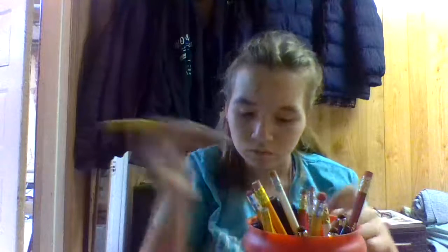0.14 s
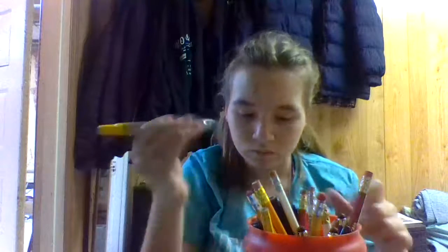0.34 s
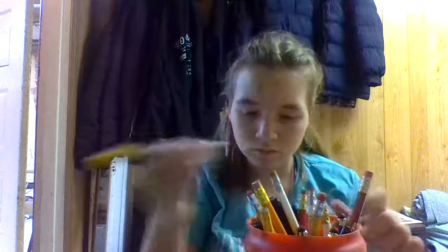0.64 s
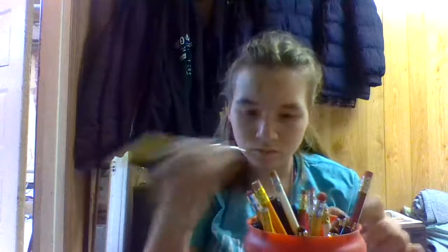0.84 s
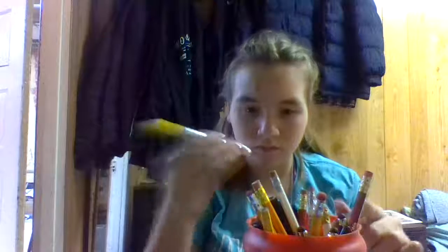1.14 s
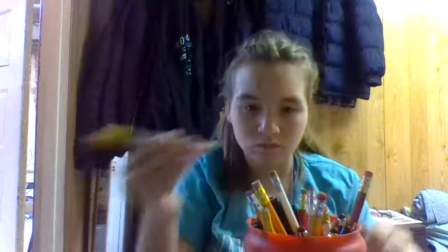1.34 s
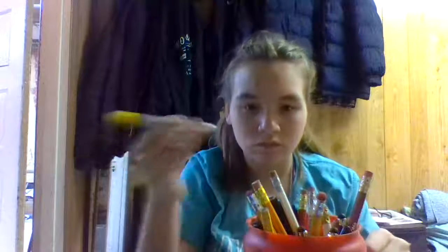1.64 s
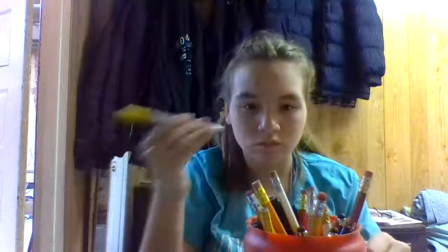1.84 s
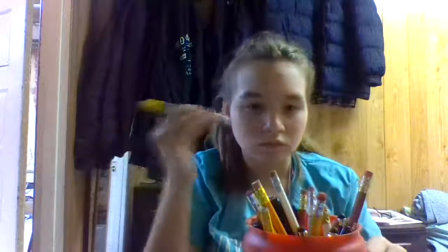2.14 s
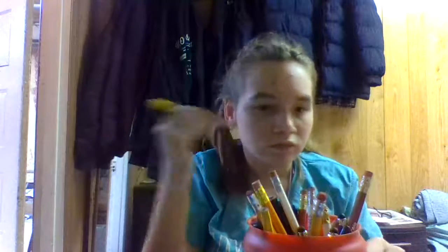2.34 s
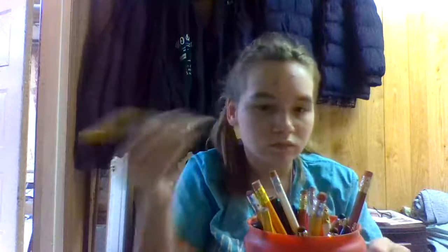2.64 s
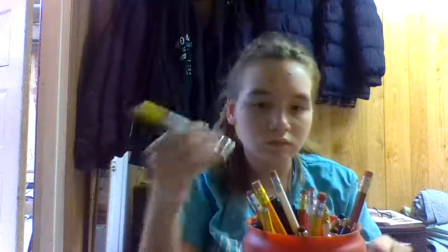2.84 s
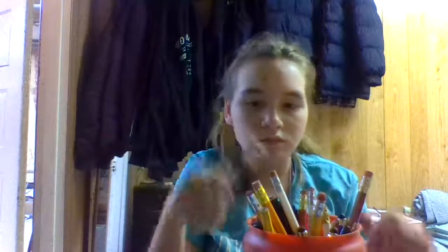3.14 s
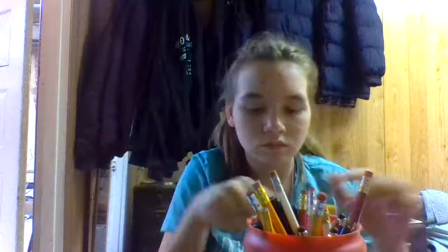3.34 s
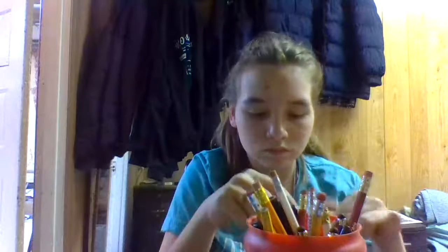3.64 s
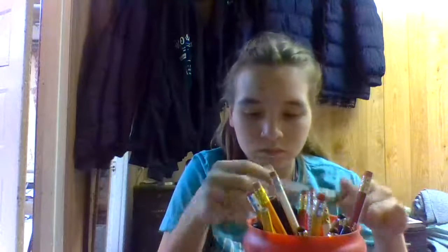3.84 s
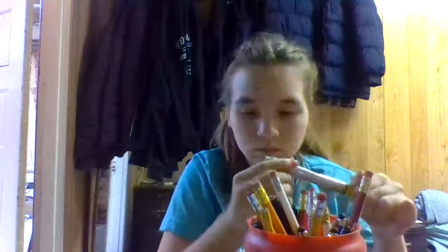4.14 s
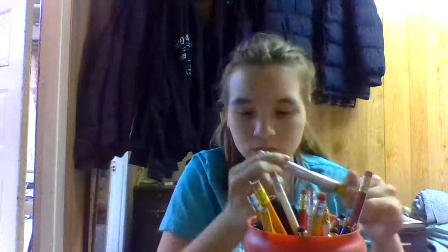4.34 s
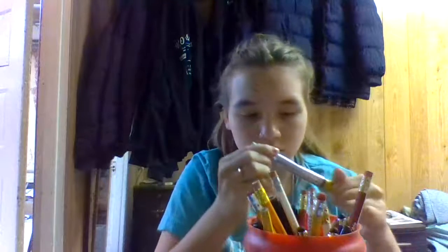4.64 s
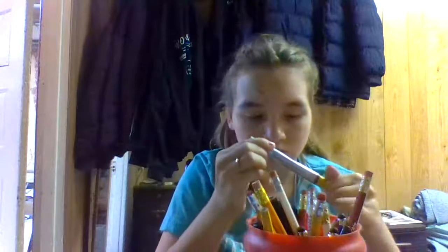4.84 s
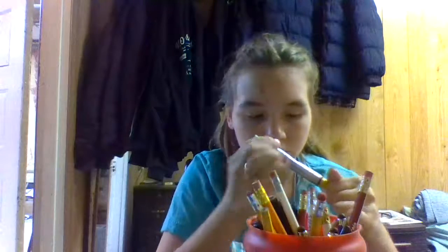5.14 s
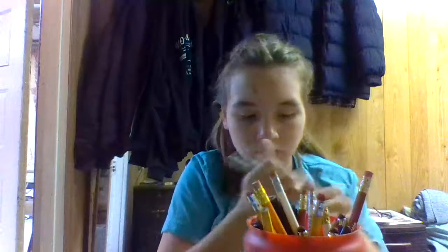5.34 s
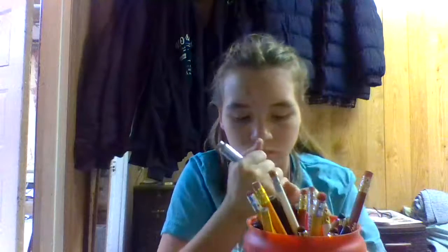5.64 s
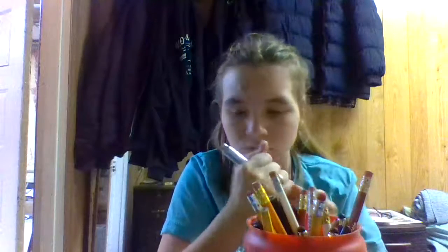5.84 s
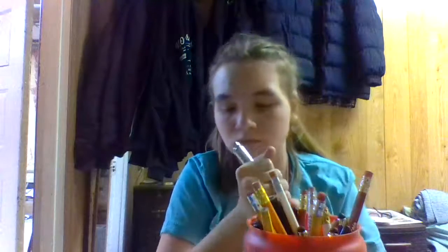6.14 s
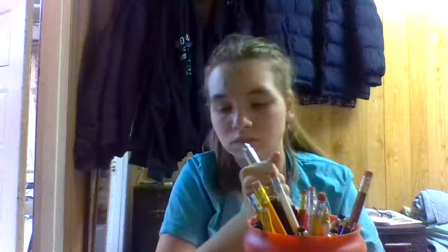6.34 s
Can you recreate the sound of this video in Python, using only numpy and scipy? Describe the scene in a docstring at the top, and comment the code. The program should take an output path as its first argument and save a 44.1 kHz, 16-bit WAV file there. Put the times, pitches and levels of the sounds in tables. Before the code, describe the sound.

A small, quiet room with low, soft fan rumble, fuzzy hum, microphone hiss and a very faint high whine with rapid pulsing. From 0.14 s a pen-like tube is shaken close to a laptop microphone: loose parts strike end to end in hard, bright, plastic-like clacks, roughly four strong hits per second with smaller uneven ticks between. The loudest, near 0.27, 0.55 and 1.0 s, overload slightly; each has a brief ring and short room echo. A low puff of air thumps at 1.23 s. Shaking pauses around 2.1-2.4 s, where a faint, thin whistle sags and drops. Clacks resume at 2.45 s, cluster around 2.7-3.2 s, then stop. A lone clack comes at 3.64 s and a weak one at 4.05 s. Soft fizzy finger slides occur at 3.7, 4.4-4.7 and 5.1-5.5 s, with barely audible ticks; then only background remains until about 6.4 s.

```python
"""Rattling tube shaken by hand

A hand shakes a pen-like tube close to a laptop microphone in a small quiet room, then fingers turn it over.
Clacks are bursts of tiny knocks with a ring and a room echo; the hardest ones overload the input.
One puff of air thumps, a thin whistle sags and drops away, and sliding fingers make swells of bright noise.
Behind them lie a fan of shaped noise and fuzzy tones, microphone hiss, and a faint whine of sine tones.
"""
import sys
import numpy as np
from scipy import signal
from scipy.fft import rfft, irfft
from scipy.io import wavfile
from scipy.ndimage import uniform_filter1d

SR = 44100
rng = np.random.default_rng(int(sys.argv[2]) if len(sys.argv) > 2 else 0)


def wav_out(sig):
    """Save sig, one row per channel (or a flat mono array), as 16-bit PCM at SR to the path in sys.argv[1]."""
    wavfile.write(sys.argv[1], SR, np.round(np.clip(np.atleast_2d(sig).T, -1, 1) * 32767).astype(np.int16))


N = 286209  # length in samples
NOISE_TOP_HZ = 15850  # noise layers and room echo stop here


def gain_of(db):
    """Turn decibels into an amplitude factor."""
    return 10 ** (np.asarray(db) / 20)


def evened(x):
    """Scale a signal to an RMS of one."""
    return x / np.sqrt(np.mean(x ** 2) + 1e-20)


def read_curve(points, hz):
    """Read a curve of (Hz, value) points, interpolated along log frequency."""
    point_hz, value = np.transpose(points)
    return np.interp(np.log(hz + 1), np.log(point_hz + 1), value)


def add(mix, start_s, sound):
    """Mix a sound in at its start, cut off at the end of the scene."""
    part = mix[round(start_s * SR):][:len(sound)]
    part += sound[:len(part)]


def coloured(points, patchy_db):
    """Noise from random short-time spectra, with patches of level that drift in time and frequency."""
    hz = np.fft.rfftfreq(2048, 1 / SR)
    real, imaginary, patches = rng.standard_normal((N // 512 + 5, 1025, 3)).T
    patches = evened(uniform_filter1d(uniform_filter1d(patches, 6, 0), 6, 1))
    level_db = read_curve(points, hz)[:, None] + patchy_db * patches
    spectra = (real + 1j * imaginary) * gain_of(level_db) * (hz < NOISE_TOP_HZ)[:, None]
    return evened(signal.istft(spectra, nperseg=2048, noverlap=1536)[1][:N])


def fan():
    """Moving air makes broad rumble; narrow noise bands around fixed pitches make fuzzy tones."""
    # Rumble colour. Each row: frequency in Hz, relative density in dB per Hz.
    air_colour = [(8.8, -16), (15, 4.5), (32, -2), (49, -6.5), (118, -3.5), (207, -11), (239, -20),
                  (296, -19), (324, -36), (409, -25.5), (448, -34.5), (608, -27), (665, -41), (768, -25.5),
                  (1100, -40), (1430, -67.5), (2420, -120)]
    # Fuzzy tones. Each row: centre in Hz, width in Hz, RMS level in dB.
    hums = [(119.1, 5.6, -43), (299.8, 8, -57), (634, 23, -60.5), (6200, 49, -74.5)]
    t = np.arange(N) / SR
    out = gain_of(-35) * coloured(air_colour, patchy_db=1.5)
    for hz, width_hz, db in hums:
        pole = np.exp(-np.pi * width_hz / SR)
        noise = rng.standard_normal(N) + 1j * rng.standard_normal(N)
        drift = signal.lfilter([1 - pole], [1, -pole], noise)
        out += gain_of(db) * evened((drift * np.exp(2j * np.pi * hz * t)).real)
    return out


def microphone_hiss():
    """Steady noise of the microphone, weaker towards the treble."""
    # Hiss colour. Each row: frequency in Hz, relative density in dB per Hz.
    hiss_colour = [(590, -6.5), (1000, -1), (2100, -3.5), (2240, -4), (2770, -6), (6830, -15.5),
                   (8280, -17), (10300, -14), (13000, -21)]
    return gain_of(-55) * coloured(hiss_colour, patchy_db=0.9)


def electronics():
    """A high hump of hiss, a comb of steady sine tones, and sine tones that pulse on and off."""
    # High hiss hump. Each row: frequency in Hz, relative density in dB per Hz.
    top_hiss = [(11000, -37), (12500, -18.5), (13600, -5), (13950, -5), (14450, -4), (14700, -15),
                (15900, -29)]
    # Steady whine. Each row: multiple of the base pitch, RMS level in dB.
    whine = [(36, -84.5), (40, -81), (41, -86.5), (42, -85), (44, -74), (45, -75), (48, -79.5), (50, -78)]
    # Pulsing tones. Each row: frequency in Hz, RMS level while on in dB.
    pulsed_tones = [(8000, -70), (8683, -81), (13096, -66), (13790, -73)]
    whine_base_hz = 307.2
    pulses_per_s, pulse_middle_s, on_share = 16.7, 5.2816, 0.53
    t = np.arange(N) / SR

    hiss = gain_of(-58.5) * coloured(top_hiss, patchy_db=2.0)
    steady = sum(gain_of(db) * np.sin(2 * np.pi * (multiple * whine_base_hz * t + rng.random()))
                 for multiple, db in whine)
    pulsed = sum(gain_of(db) * np.sin(2 * np.pi * (hz * t + rng.random())) for hz, db in pulsed_tones)
    turn = ((t - pulse_middle_s) * pulses_per_s + 0.5) % 1 - 0.5  # zero in the middle of each pulse
    on = np.clip((on_share / 2 - abs(turn)) * 30 + 0.5, 0, 1)  # soft-edged switch
    return hiss + np.sqrt(2) * (steady + on * pulsed)  # root two: RMS to peak


def fingers():
    """Skin sliding on the tube: bright friction noise that swells, holds and fades with each slide."""
    # Finger slides. Each row: start in seconds, length in seconds, held level in dB.
    rubs = [(3.7, 0.24, -58.5), (4.419, 0.29, -57.5), (4.67, .07, -63), (5.14, .1, -54), (5.32, .07, -58),
            (5.44, 0.049, -55)]
    # Friction colour. Each row: frequency in Hz, relative density in dB per Hz.
    rub_colour = [(3000, -36.5), (8000, -14), (11000, -8), (13500, -2.5), (15900, -4)]
    attack, release = 0.19, 0.4  # shares of the slide
    t, level = np.arange(N) / SR, np.zeros(N)
    for start_s, length_s, db in rubs:
        progress = (t - start_s) / length_s
        swell = np.minimum(progress / attack, (1 - progress) / release)
        level += gain_of(db) * np.clip(swell, 0, 1)
    return level * coloured(rub_colour, patchy_db=1.5)


def squeak():
    """A thin wavering sine whistle whose pitch sags slowly, then drops away."""
    # One whistle: start in seconds, length in seconds, base pitch in Hz, level in dB before the waver.
    whistle = (2.09, .23, 5690, -63)
    sag_hz_per_s, drop_hz, drop_s, fade_s = 780, 280, 0.05, 0.03
    start_s, length_s, hz, db = whistle
    t, out = np.arange(0, length_s, 1 / SR), np.zeros(N)
    left_s = length_s - t
    pitch = hz - sag_hz_per_s * t - drop_hz * np.clip(1 - left_s / drop_s, 0, 1) ** 2
    fade = np.clip(np.minimum(t, left_s) / fade_s, 0, 1)
    waver = 1 + 0.65 * evened(uniform_filter1d(rng.standard_normal(len(t)), 600))
    phase = 2 * np.pi * np.cumsum(pitch + 20 * waver) / SR  # the waver moves pitch and level together
    add(out, start_s, gain_of(db) * fade * waver * np.sin(phase))
    return out


def thump():
    """A puff of air from the hand hits the microphone port: a quick push of pressure and a slow rebound."""
    # One puff: start in seconds, level in dB before shaping, fall time constant in seconds, rebound in Hz.
    puff = (1.2303, -4, .004, 28)
    start_s, db, fall_s, rebound_hz = puff
    t, out = np.arange(4000) / SR, np.zeros(N)
    push = 1.6 * (1 - np.exp(-t / 0.0008)) * np.exp(-t / fall_s)
    rebound = 0.35 * np.sin(2 * np.pi * rebound_hz * t) * np.exp(-t / 0.025)
    add(out, start_s, gain_of(db) * (push - rebound))
    return out


LEAD = 256  # samples ahead of each blow


def clack(band_levels_db, ring_hz, ring_db, echo_db):
    """A sharp blow with a dying spray of tiny knocks, then the dense echo of the room, band by band."""
    # Clack colour at the microphone. Each row: frequency in Hz, relative density in dB per Hz.
    clack_colour = [(150, -43), (250, -30.5), (521, -21.5), (1190, -22.5), (1410, -17), (1900, -14.5),
                    (2650, -7.5), (3440, -7.5), (4970, -0.5), (5520, -4.5), (10700, -4.5), (12600, 1.5),
                    (13700, 6.5), (15500, 3), (16300, -20)]
    # Edges in Hz between the knock, body, edge and fizz bands.
    band_edges = (2000, 7500, 11000)
    # Echo time to fall by 60 dB, in seconds, for the knock, body, edge and fizz bands.
    room_t60 = (0.1, 0.17, 0.15, 0.14)
    spray_t60_s, ring_width_hz, lead_in_db, lead_in_s, build_s = 0.01, 300, -19.5, 0.0028, 0.0023
    size = 16384
    t, hz = np.arange(-LEAD, size - LEAD) / SR, np.fft.rfftfreq(size, 1 / SR)
    spray, lumps, echo, grain, modes = rng.standard_normal((5, size))

    lumps_db = 2.0 * evened(uniform_filter1d(lumps, 30))
    spray = spray * (t >= 0) * gain_of(lumps_db - 60 * t / spray_t60_s)
    spray[LEAD] += 4.0  # the first contact is one hard spike
    echo = echo * gain_of(-2.5 * evened(uniform_filter1d(grain, 40)))  # single reflections stand out

    ring = 1 + gain_of(ring_db) / (1 + 2j * (hz - ring_hz) / ring_width_hz)  # the struck spot rings briefly
    colour = gain_of(read_curve(clack_colour, hz)) * ring
    spray = rfft(spray) * colour
    # The echo carries only half of the ring in dB, and has narrow rings of its own.
    echo = rfft(echo) * colour / abs(ring) ** 0.5 * (hz < NOISE_TOP_HZ)
    echo = echo * gain_of(2.2 * evened(uniform_filter1d(modes[:len(hz)], 30)))

    onset = np.clip(t * SR / 12 + 1, 0, 1)  # the blow starts abruptly, within 12 samples
    build = 1 - np.exp(-np.maximum(t, 0) / build_s)
    # A faint noise swells for about 3 ms before each blow.
    lead_in = gain_of(lead_in_db) * (t < 0) * np.clip(1 + t / lead_in_s, 0, 1)
    low_passes = [1 / (1 + (hz / edge) ** 12) for edge in band_edges]
    below = [0 * hz] + low_passes + [1 + 0 * hz]
    out = np.zeros(size)
    for k, db in enumerate(band_levels_db):
        band = below[k + 1] - below[k]
        direct = irfft(spray * band)
        loudest = np.sqrt(2 * uniform_filter1d(direct[:2048] ** 2, 66).max())
        out += gain_of(db) * onset * direct / loudest
        tail = gain_of(echo_db - 60 * t / room_t60[k]) * build
        out += gain_of(db) * (tail + lead_in) * evened(irfft(echo * band))
    return out


def tube():
    """Loose parts clack end to end; each blow has its own strength, brightness, ring and weight."""
    # Each row: time in seconds, body peak level in dB, brightness (fizz over body) in dB, ring in Hz,
    # ring level in dB, weight (low knock over body) in dB, room echo in dB.
    clacks = [(0.1394, -26, 8, 4900, -17, -16, -15.5), (0.182, -11, 8, 4740, -23, -15.5, -16.5),
              (0.2462, -23.5, 13, 4330, -10, -8.5, -10), (0.2694, -4, 3, 6300, 2, -25, -12.5),
              (0.2743, -3, 6.5, 4760, 13.5, -13.5, -14.5), (0.321, -28, 8.5, 5200, -10, -13, -14),
              (0.398, -27.5, 3.5, 4290, -6, -16, -14.5), (0.4374, -17, 10.5, 4070, 14, -19.5, -16.5),
              (0.4666, -22, 3, 3860, -19, -10, -15), (0.4924, -19.5, 4, 6030, 3, -14, -15.5),
              (0.545, -9.5, 9.5, 6600, -14, -6, -10), (0.5476, -0.5, 2.5, 4940, 3, -21, -15.5),
              (0.568, -31.5, 15.5, 4900, 11, -26, -6), (0.613, -27, 6, 5400, 5, -16, -14),
              (0.6523, -17.5, 4, 4280, -3, -13, -15), (0.67, -16.5, 2, 4030, 3, -11, -13),
              (0.6801, -12, 8, 4080, 29, -10, -15), (0.6885, -21.5, 7.5, 4100, 5, -11, -15),
              (0.704, -23.5, 3, 3910, 3, -6, -20), (0.7786, -6.5, 4, 5800, 9, -14.5, -11),
              (0.7836, -17, 13.5, 4700, -2, -14, -15), (0.7905, -19, -3.5, 4670, -5, -10, -17),
              (0.9035, -13.5, 9, 3860, 8, -14, -19), (0.9178, -11.5, 6.5, 3960, 2, -16, -17),
              (0.9301, -25.5, 0, 4140, -14, -1, -16), (0.9506, -27, 9.5, 4320, 34, -10, -12),
              (1.0072, 1.5, 6, 6700, 4, -15, -17.5), (1.0124, -4.5, 11, 5260, 18, -25, -12.5),
              (1.047, -26, 12, 4870, 15, -14, -18), (1.0577, -18, 7.5, 4680, 14, -17, -17),
              (1.1211, -16.5, 2, 4060, -25, -17.5, -17.5), (1.1255, -32.5, 15.5, 4310, -5, -14, -18),
              (1.1564, -29, 10, 4500, -13, -7, -22), (1.1638, -22, -2, 4610, 0, -6, -19.5),
              (1.2113, -28, 10.5, 2130, 6, -13, -17), (1.231, -3.5, 3.5, 5730, 14, -14.5, -15),
              (1.233, -9, 10, 6350, 29, -11.5, -11), (1.2492, -18, 11, 4680, 20, -16, -16),
              (1.327, -21.5, 4.5, 4300, -11, -9.5, -12), (1.395, -18, 7, 4370, -8, -11, -15),
              (1.4122, -30, 7, 4570, 1, -12, -17), (1.4629, -19, 10, 3100, 11, -9.5, -7),
              (1.4702, -4.5, 6, 2970, 3, -15, -12.5), (1.474, -15, -10, 4700, 15, -10, -13),
              (1.4867, -9.5, 2, 4660, 8, -13.5, -15.5), (1.5671, -18.5, 3, 4440, -9, -16.5, -17),
              (1.6236, -29, 7.5, 2860, 19, -3.5, -25), (1.6317, -25, 9.5, 4020, -2, -13, -17.5),
              (1.7013, -32, 3, 5070, 3, -19, -16.5), (1.7061, -5, 7, 6240, 5, -12, -13.5),
              (1.712, -6.5, -9, 4350, 4, -15, -17.5), (1.7211, -15, 8, 4660, 10, -17, -14),
              (1.8159, -29.5, 3, 3920, -4, -16, -12), (1.86, -15.5, 5.5, 4320, -19, -11.5, -14.5),
              (1.9013, -34, 7, 3920, 3, -16, -8.5), (1.956, -10, 1.5, 6000, -2, -13.5, -14),
              (1.9623, -7.5, 3.5, 4860, -16, -15, -12.5), (1.971, -16.5, 0, 4940, -1, -13, -12),
              (2.0259, -14.5, 6.5, 4360, 2, -19, -15.5), (2.0336, -39, -3, 4570, 14, -21, -15),
              (2.0783, -36.5, 3, 4250, 1, -10, -10), (2.3, -37, -6, 3650, 14, -10, -10.5),
              (2.451, -10, 2, 6460, 12, -18, -22), (2.4571, -9.5, 5.5, 5020, -11, -16.5, -14.5),
              (2.4968, -27.5, -1, 4700, 19, -20, -14), (2.5743, -28, 3.5, 3670, 23, -9, -16),
              (2.717, -4.5, 7, 4320, 1, -13.5, -14.5), (2.7219, -17, 21, 4600, 0, -10, -26),
              (2.7547, -15.5, 1, 4600, 13, -15, -13), (2.7849, -17.5, 7, 3840, -2, -16, -15.5),
              (2.8096, -17, 6, 4630, -19, -12, -17), (2.8563, -20, 7.5, 5150, -12, -15, -12),
              (2.8908, -7, -1.5, 5800, 7, -19, -9.5), (2.8956, -9, 18, 4500, 19, -28, -17),
              (2.91, -15.5, 3.5, 5060, 5, -21, -16), (2.9153, -19, 1, 5030, 3, -13, -19),
              (2.9706, -24, 5, 2880, 0, -19, -7), (2.9796, -12, 7, 5240, 3, -26, -19.5),
              (2.9887, -30, 14, 5730, 3, -21, -13), (3.0683, -13.5, 9.5, 4760, -4, -24, -17),
              (3.0862, -27, 12, 6400, 9, -22, -16), (3.1391, -15.5, 7, 4430, 4, -17, -14.5),
              (3.1872, -22, 0, 4530, 10, -32, -21), (3.1965, -27, -6, 5010, 10, -28, -8.5),
              (3.3735, -38, 3, 3380, 10, -8, -14), (3.6393, -15, 0, 5100, 13, -27, -17.5),
              (4.0547, -28, 9, 4400, 21, -16, -16.5), (5.1633, -45, 4, 4240, 3, -14, -16),
              (5.1908, -51, 13, 2720, 5, -16, -16), (5.4494, -39.5, 4, 2270, 30, -15, -15)]
    out = np.zeros(N)
    for time_s, body_db, bright_db, ring_hz, ring_db, weight_db, echo_db in clacks:
        edge_db = body_db - 7.5 + 0.13 * bright_db  # under the body, sharing some of the brightness
        band_levels_db = (body_db + weight_db, body_db, edge_db, body_db + bright_db)
        add(out, time_s - LEAD / SR, clack(band_levels_db, ring_hz, ring_db, echo_db))
    return out


def scene():
    """Sum every layer into one channel."""
    background = fan() + microphone_hiss() + electronics()
    handling = fingers() + squeak() + thump()
    return (background + handling + tube())[None]


def record(dry):
    """The input stage saturates on the hardest clacks; then a low-pass limits the band."""
    clipped = dry / (1 + abs(dry) ** 6.0) ** (1 / 6.0)
    low_pass = signal.firwin(255, 16450, window=("kaiser", 8), fs=SR)  # cutoff in Hz
    return signal.oaconvolve(clipped, low_pass[None], "same")


dry = scene()
out = record(dry)
wav_out(out)
```